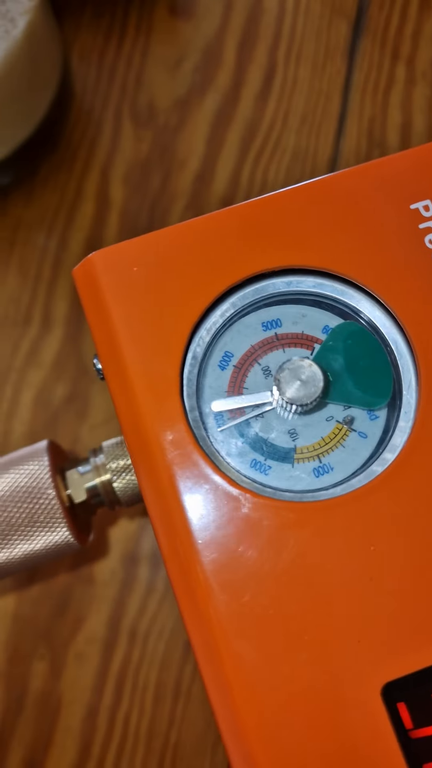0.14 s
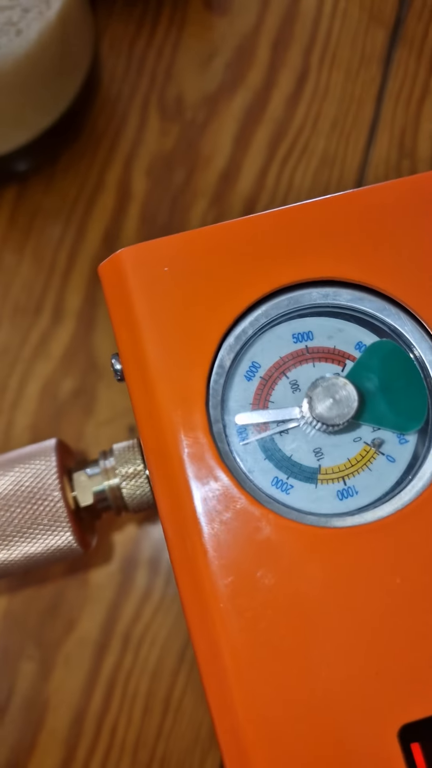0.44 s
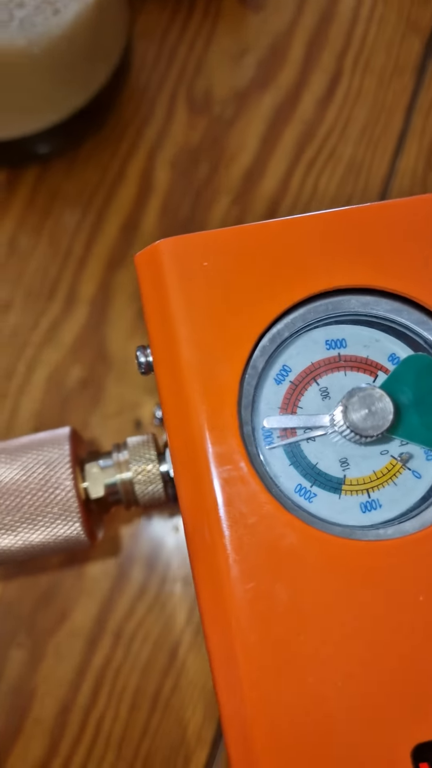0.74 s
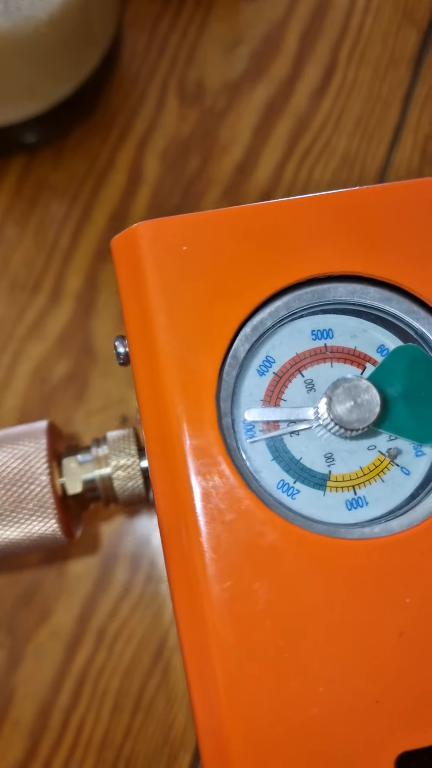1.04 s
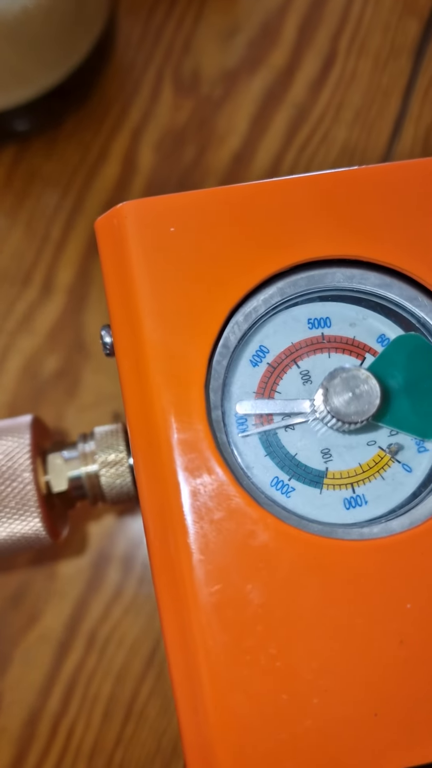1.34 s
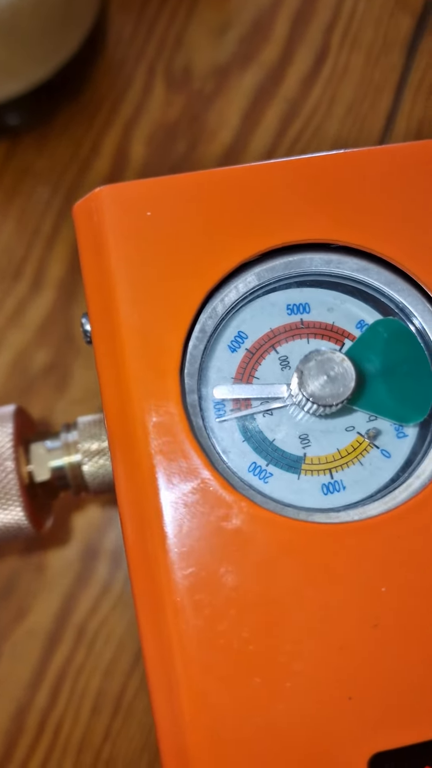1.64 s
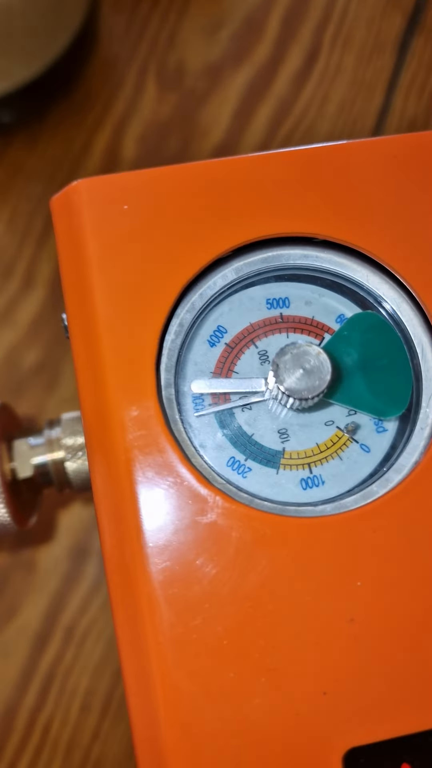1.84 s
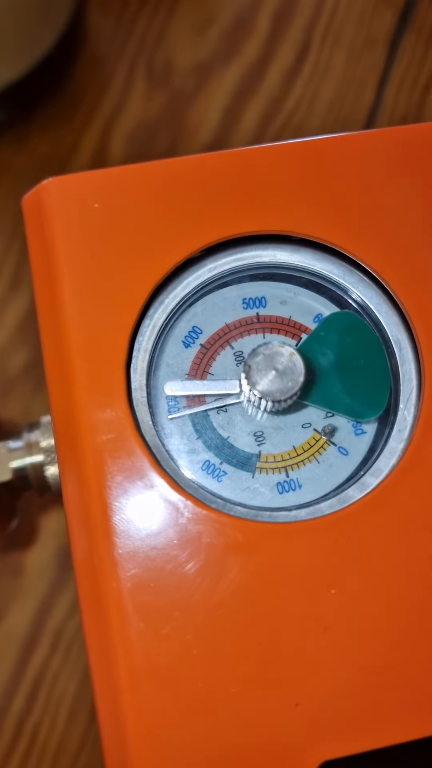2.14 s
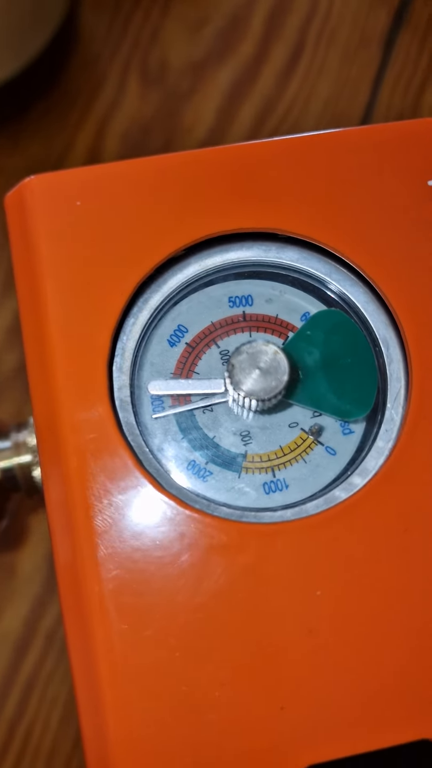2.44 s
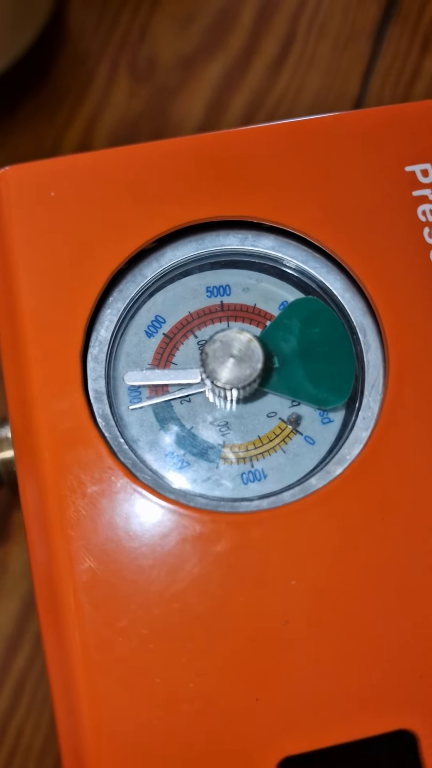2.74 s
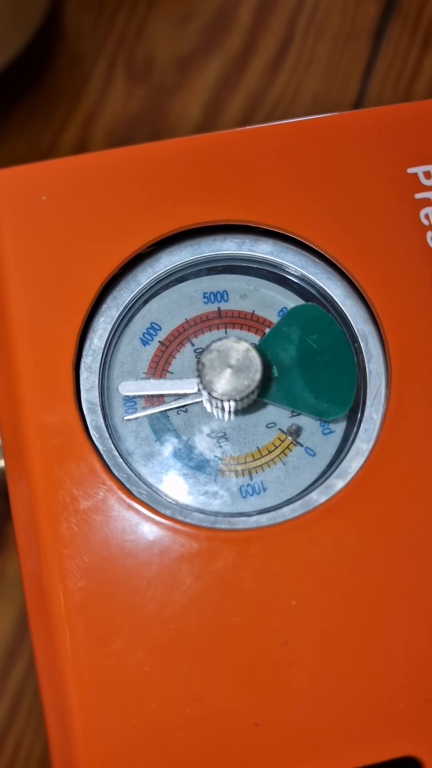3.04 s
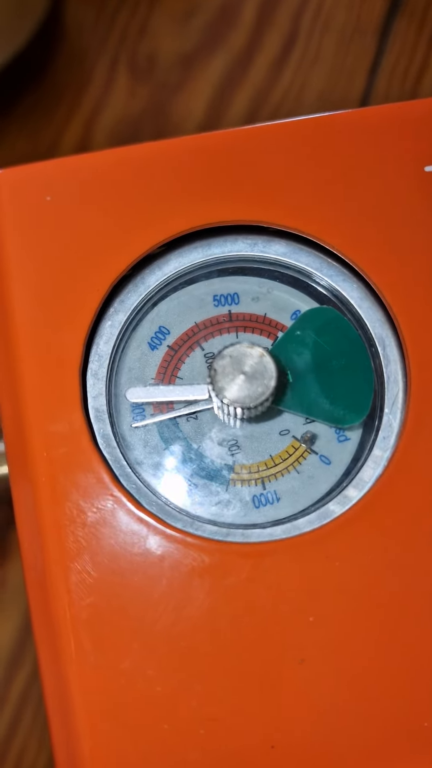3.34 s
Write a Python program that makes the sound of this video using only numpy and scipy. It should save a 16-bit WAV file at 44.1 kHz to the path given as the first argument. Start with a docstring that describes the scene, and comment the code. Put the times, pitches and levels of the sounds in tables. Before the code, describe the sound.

Small air compressor chugging steadily, fast metallic piston clatter with low thumps and thin motor whine

```python
"""Small air compressor on a wooden table

A geared compressor pumps about five strokes a second, heard in stereo from close by, indoors.
Each crank turn showers ticks onto ringing steel case modes (seven clacks, loud and soft) and kicks
the feet and table in two thumps; short tones swell and fade around the clacks and thumps of each turn.
Gear rattle rings the same case throughout, with a motor whine of thin sines and fan and motor noise
that is brighter on the left. Filtered feedback delays add the room."""
import sys
import numpy as np
from scipy import signal
from scipy.fft import rfft, irfft, next_fast_len
from scipy.io import wavfile

SR = 44100
rng = np.random.default_rng(int(sys.argv[2]) if len(sys.argv) > 2 else 0)


def ratio_of_db(decibels):
    """Turn decibels (scalar or array-like) into linear amplitude factors; 0 dB maps to 1."""
    return 10 ** (np.asarray(decibels, float) / 20)


def dump(signal):
    """Clip the signal to [-1, 1] and save it as 16-bit WAV at the path in sys.argv[1]."""
    limited = np.clip(np.atleast_2d(signal).T, -1, 1)
    pcm = np.round(limited * 32767).astype(np.int16)
    wavfile.write(sys.argv[1], SR, pcm)


N = 154350
LEAD = SR // 2  # samples run before the start, so that earlier sounds are already ringing


def rms_one(x):
    """Scales to rms 1."""
    return x / np.sqrt(np.mean(x ** 2) + 1e-20)


def at_hz(points, hz):
    """Reads a table of (Hz, value) on a log-frequency axis."""
    table_hz, values = np.transpose(points)
    return np.interp(np.log(hz + 1), np.log(table_hz), values)


def drift(rate_hz):
    """Slow chance of spread 1: noise through two equal one-pole low-passes, one value every 40 samples."""
    pole = np.exp(-80 * np.pi * rate_hz / SR)
    noise = rng.standard_normal(N // 40 + 2002)
    slow = signal.lfilter([1], [1, -2 * pole, pole * pole], noise)[2000:]
    return np.interp(np.arange(N) / 40, np.arange(len(slow)), rms_one(slow - slow.mean()))


def ring(clicks, hz, t60):
    """A two-pole resonator: a unit click sets a sine of height 1 ringing, down 60 dB after t60 seconds."""
    pole, w = 1000 ** (-1 / (t60 * SR)), 2 * np.pi * hz / SR
    return signal.lfilter([0, np.sin(w)], [1, -2 * pole * np.cos(w), pole * pole], clicks + 1e-18)


# Compression strokes of the pump. Each row: start in seconds, strength in dB (taken from the mean).
STROKES = [(0.1138, -4.5), (0.3154, 0.5), (0.516, -7.5), (0.7187, -4.5), (0.9215, -4.5), (1.1217, -9),
           (1.3244, -9), (1.5289, 1), (1.7339, -4.5), (1.9318, -4.5), (2.134, -4), (2.3364, 1.5),
           (2.5422, -6.5), (2.7422, -2), (2.9458, -8.5), (3.1488, -0.5), (3.3505, -3.5)]
TURN_S = .2023
STROKE_FOLLOWS = 0.13  # share of a stroke's strength in dB that reaches its sounds


def turns():
    """Start (s) and strength (dB) of every crank turn, with the one already under way."""
    start_s, db = np.transpose(STROKES)
    return np.r_[start_s[0] - TURN_S, start_s], np.r_[0, STROKE_FOLLOWS * (db - db.mean())]


def train(delay_s, db, jitter_s, spread_db):
    """One click a turn, a little uneven in time and level, on a time line that starts LEAD samples early."""
    start_s, strength_db = turns()
    chance = rng.standard_normal((len(start_s), 2))
    at = LEAD + ((start_s + delay_s + jitter_s * chance[:, 0]) * SR).astype(int)
    clicks = np.zeros(N + 2 * LEAD)
    clicks[at] = ratio_of_db(db + strength_db + spread_db * chance[:, 1])
    return clicks[:N + LEAD]


# Clacks in one turn. Each row: delay in seconds, length in seconds (twice the decay time constant), then
# relative level in dB into modes up to 1.1 kHz, into modes up to 1.7 kHz, and into those above.
CLACKS = [(-.0005, 0.015, -3, -0.5, -3), (0.036, 0.0092, -1.5, -3, -1), (0.065, .014, -10, -12, -31),
          (0.0971, 0.011, -2.5, -3, -0.5), (0.1293, 0.012, -12.5, -0.5, -7), (0.145, 0.037, -15, -9.5, -20),
          (0.182, .012, -13, -14, -23)]
CLACK_DB, CLACK_SPREAD_DB, CLACK_JITTER_S = -26, 1.2, .0008
LEAD_TICK_DB = 13  # firm first tick over the shower's start
CLACK_TICKS_PER_S = 6000
CLACK_DAMPING = .6  # the contact shortens the ring to this share of t60
RATTLE_PER_S, RATTLE_DB, RATTLE_SIZE_DB = 900, -38, 3.5
CRACK_DB, CRACK_LOW_HZ, CRACK_HIGH_HZ = 1.5, 700, 2900
CASE_LIKENESS = 0.74  # how alike the ticks are on the two sides, 0 to 1
CASE_LOW_HZ = 450
# Modes of the steel case, undamped. Each row: frequency in Hz, left level in dB, right level in dB,
# t60 in seconds.
CASE_MODES = [(551.3, -8, -11.5, 0.044), (661, 1.5, -3.5, 0.066), (762, -3, -4, 0.049),
              (864, -9, -3, 0.043), (915, -4, 3, 0.045), (983, -5.5, 2.5, 0.091), (1163.7, -6, -2, 0.081),
              (1242, -15, -10.5, 0.11), (1414.4, 4.5, 3, 0.036), (1488, -4, 5, 0.059),
              (1586, -0.5, -2, 0.034), (1843, -2, 4.5, 0.052), (2093, -6.5, -8, 0.052),
              (2300, -15, -9, 0.03), (2660, -12, -14.5, 0.032)]


def case():
    """Clacks are a firm tick and a short shower of small ones, damped by the contact; rattle is a steady shower.

    Each mode feels the ticks differently, and every other mode reaches the two sides in opposition."""
    size = N + LEAD
    lead = np.zeros((3, size))
    shower = np.zeros((3, size))
    for delay_s, length_s, *dbs in CLACKS:
        fall = np.exp(-2 / (length_s * SR))
        clicks = train(delay_s, CLACK_DB, CLACK_JITTER_S, CLACK_SPREAD_DB)
        blows = ratio_of_db(dbs)[:, None] * clicks
        lead += ratio_of_db(LEAD_TICK_DB) * blows
        shower += signal.lfilter([1], [1, -fall], blows)

    ticks = rng.random(size) < CLACK_TICKS_PER_S / SR
    rattle_times = rng.random(size) < RATTLE_PER_S / SR
    rattle_size = np.minimum(rng.exponential(1, size), 4)
    rattle = rattle_times * ratio_of_db(RATTLE_DB + RATTLE_SIZE_DB * rattle_size)

    ringing = np.zeros((2, size))
    for k, (hz, left_db, right_db, t60) in enumerate(CASE_MODES):
        group = int(hz > 1100) + int(hz > 1700)
        polarity = (-1) ** k
        one, other = rng.choice([-1., 1.], (2, size))
        right = CASE_LIKENESS * one + np.sqrt(1 - CASE_LIKENESS ** 2) * other
        felt = np.array([one, polarity * right])
        clack = lead[group] * [[1], [polarity]] + shower[group] * ticks * felt
        rung = ring(clack, hz, CLACK_DAMPING * t60) + ring(rattle * felt, hz, t60)
        ringing += ratio_of_db([[left_db], [right_db]]) * rung

    # each clack also cracks: band noise that fades with its shower
    band = signal.butter(2, [CRACK_LOW_HZ, CRACK_HIGH_HZ], "band", fs=SR, output="sos")
    crack = signal.sosfilt(band, shower[2] * rng.standard_normal((2, size)))
    thin = signal.butter(4, CASE_LOW_HZ, "high", fs=SR, output="sos")
    return signal.sosfilt(thin, ringing + ratio_of_db(CRACK_DB) * crack)[:, LEAD:]


# Thumps in one turn. Each row: delay in seconds, kick level in dB.
THUMPS = [(.0075, -18.5), (.033, -16.5)]
THUMP_JITTER_S, THUMP_SPREAD_DB = .0003, .7
# Resonances of feet and table. Each row: frequency in Hz, relative level in dB, t60 in seconds.
FEET = [(45, -18, .15), (63.6, -8.5, 0.25), (95.6, -6, 0.29), (131, -12, 0.029), (158.5, -1, 0.049),
        (193, -2, 0.07)]


def thumps():
    """The piston load kicks the feet and the table the same way every turn; low modes ring."""
    kicks = sum(train(delay_s, db, THUMP_JITTER_S, THUMP_SPREAD_DB) for delay_s, db in THUMPS)
    soft = signal.sosfilt(signal.butter(2, 300, fs=SR, output="sos"), kicks)
    rung = sum(ratio_of_db(db) * ring(soft, hz, t60) for hz, db, t60 in FEET)
    return -ratio_of_db([[.8], [-.8]]) * rung[LEAD:]  # slightly stronger on the left


# Side on which the swelling tones are heard. Each row: frequency in Hz, left over right in dB.
SWELL_PAN = [(250, -3.5), (300, -2), (350, -5.5), (680, 3), (850, -8), (1480, -6), (1620, 0), (2000, -1.5)]
SWELL_SPREAD_DB, SWELL_JITTER_S = 1.6, .0004
SWELL_DETUNE = .006  # spread of pitch, as a share of it
# Tones of case and table in one turn. Each row: delay in seconds, frequency in Hz, level in dB,
# rise time in seconds.
SWELLS = [(0.00596, 280, -18.5, 0.0154), (0.00792, 275, -10, 0.0098), (.038, 275, -19.5, 0.016),
          (.030, 303, -18, 0.02), (0.00482, 347, -15.5, 0.0082), (.038, 349, -16, 0.015),
          (0.062, 260, -23.5, 0.015), (.128, 303, -20.5, 0.021), (.130, 352, -16, 0.015),
          (.145, 265, -24, 0.017), (.065, 352, -21, .014), (.165, 350, -24, 0.019),
          (.165, 680, -25.5, 0.007), (.080, 840, -20, 0.0078), (.062, 885, -20.5, 0.0083),
          (.035, 912, -16, 0.0075), (0.00304, 840, -19, 0.0052), (0.00044, 1470, -15.5, 0.0037),
          (.036, 1990, -18.5, 0.0036), (.098, 1620, -19, 0.0044), (.132, 1480, -18, 0.0034)]


def swells():
    """Each tone rises for its rise time and dies away, a little off pitch every turn."""
    out = np.zeros((2, N + 2 * LEAD))
    starts, strengths_db = turns()
    for delay_s, hz, db, rise_s in SWELLS:
        pan_db = np.array([[.5], [-.5]]) * at_hz(SWELL_PAN, hz)
        t = np.arange(int(8 * rise_s * SR)) / SR
        swell = t / rise_s * np.exp(1 - t / rise_s)
        chance = rng.standard_normal((len(starts), 3))
        for start_s, strength_db, (pitch, time, level) in zip(starts, strengths_db, chance):
            tone = swell * np.sin(2 * np.pi * hz * (1 + SWELL_DETUNE * pitch) * t)
            i = LEAD + int((start_s + delay_s + SWELL_JITTER_S * time) * SR)
            tone_db = db + strength_db + SWELL_SPREAD_DB * level + pan_db
            out[:, i:i + len(t)] += ratio_of_db(tone_db) * tone
    return out[:, LEAD:LEAD + N]


# Course of the whine's level. Each row: time in seconds, gain in dB.
WHINE_LEVEL = [(0, -1.5), (.8, -2.5), (1.1, 4.5), (1.7, 0.5), (2.3, 2), (2.6, 2), (3, 2.5), (3.5, 3)]
WHINE_WANDER_HZ = 1.5  # of the first line; the others wander in proportion
WHINE_FLICKER_DB = 1.3
# Lines of the motor whine. Each row: frequency in Hz, left rms in dB, right rms in dB, before that gain.
WHINE = [(2527.7, -33.5, -40), (2531.7, -38, -43), (3795, -44, -48), (5057, -36, -49), (6322, -44, -52),
         (7587, -48, -57)]


def whine():
    """Thin sine lines that wander together in pitch and flicker apart, the sides a quarter cycle apart."""
    t = np.arange(N) / SR
    wander_s = np.cumsum(drift(2.73)) / SR * WHINE_WANDER_HZ / WHINE[0][0]
    level_db = np.interp(t, *np.transpose(WHINE_LEVEL))
    quarter = np.array([[0], [np.pi / 2]])
    out = np.zeros((2, N))
    for hz, *dbs in WHINE:
        line_db = level_db + WHINE_FLICKER_DB * drift(2.2) + np.array(dbs)[:, None]
        phase = 2 * np.pi * (hz * (t + wander_s) + rng.random())
        out += np.sqrt(2) * ratio_of_db(line_db) * np.sin(phase + quarter)
    return out


# Spectrum of fan and motor noise. Each row: frequency in Hz, relative density in dB per Hz.
AIR = [(24, -44), (45, -7.5), (199, -12.5), (269, -4), (345, -10), (455, -7.5), (918, -7), (1440, -12.5),
       (2400, -13.5), (3060, -21), (5180, -19), (7600, -20), (8200, -24), (10500, -25.5), (13000, -25),
       (15000, -27), (16300, -33)]
# Side balance of that noise. Each row: frequency in Hz, left over right in dB.
AIR_BALANCE = [(60, 2), (110, 1.5), (200, -2), (380, -2), (700, 1), (1290, 1), (2380, 2), (4400, 8),
               (8120, 6.5), (15000, 11.5)]
# Likeness of its two sides. Each row: frequency in Hz, correlation from 0 to 1.
AIR_LIKENESS = [(60, .96), (140, .6), (250, .75), (350, .8), (520, .3), (700, .1), (3000, .05), (15000, 0)]
AIR_DB, AIR_FLICKER_DB, AIR_TOP_HZ = -20, 0.52, 16370


def air():
    """Fan and motor noise: coloured stereo noise, most alike on the two sides in the bass."""
    hz = np.fft.rfftfreq(N, 1 / SR)
    mid, side = rfft(rng.standard_normal((2, N)))
    alike = np.clip(at_hz(AIR_LIKENESS, hz), -1, 1)
    sides = np.array([[1], [-1]])
    pair = np.sqrt(1 + alike) * mid + np.sqrt(1 - alike) * side * sides
    colour = ratio_of_db(at_hz(AIR, hz) + .5 * sides * at_hz(AIR_BALANCE, hz))
    noise = rms_one(irfft(pair * colour * (hz < AIR_TOP_HZ), N))
    return ratio_of_db(AIR_DB + AIR_FLICKER_DB * drift(14)) * noise


ROOM_DB, ROOM_LOW_HZ = -15, 600
ROOM_T60_S = .2  # before the dull walls shorten it
WALL_CUT_HZ = 3000


def room(x):
    """Six feedback delays a side, duller at every pass, thin in the bass."""
    size = next_fast_len(N + SR)
    w = 2 * np.pi * np.fft.rfftfreq(size, 1 / SR)
    dull = 1 / (1 + 1j * w / (2 * np.pi * WALL_CUT_HZ))
    lags_s = rng.uniform(.011, .04, 12)
    loops = [1000 ** (-lag / ROOM_T60_S) * dull * np.exp(-1j * w * lag) for lag in lags_s]
    tail = np.array([sum((-1) ** k * g / (1 - g) for k, g in enumerate(loops[c::2])) for c in (0, 1)])
    thin = 1 / (1 - 1j * 2 * np.pi * ROOM_LOW_HZ / (w + 1)) ** 2  # high-pass
    return irfft(rfft(x, size) * tail * thin, size)[:, :N]


def scene():
    """Machine on the table with its room, plus whine and air."""
    machine = case() + thumps() + swells()
    return machine + ratio_of_db(ROOM_DB) * room(machine) + whine() + air()


def low_pass(x):
    """Removes everything above the highest recorded frequency."""
    return signal.sosfilt(signal.butter(12, 16370, fs=SR, output="sos"), x)


def record(dry):
    """Bass is cut below 54 Hz and peaks are rounded by a soft curve."""
    low_cut = signal.butter(4, 54, "high", fs=SR, output="sos")
    ceiling = 1.36
    x = signal.sosfilt(low_cut, dry)
    return low_pass(ceiling * np.tanh(x / ceiling))


dry = scene()
out = record(dry)
dump(out)
```